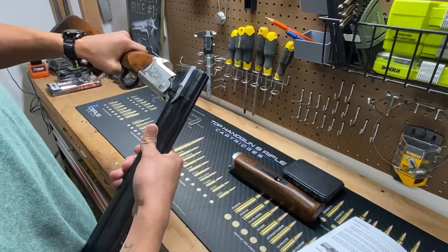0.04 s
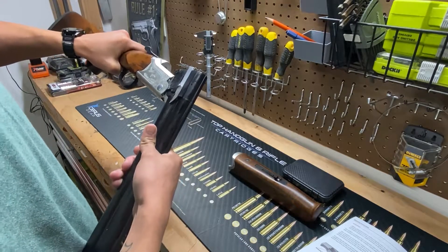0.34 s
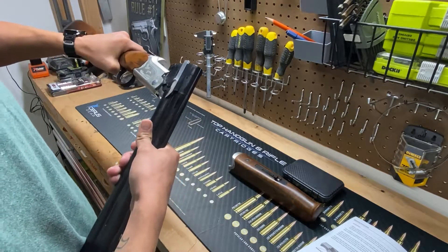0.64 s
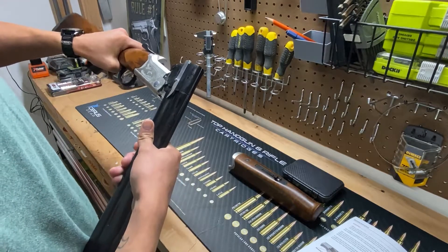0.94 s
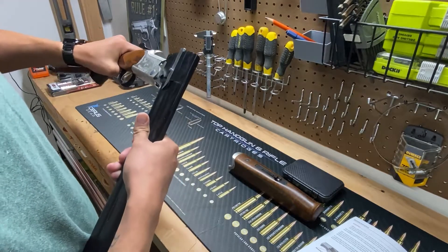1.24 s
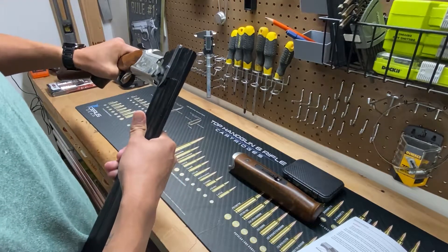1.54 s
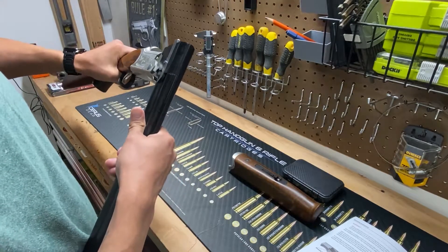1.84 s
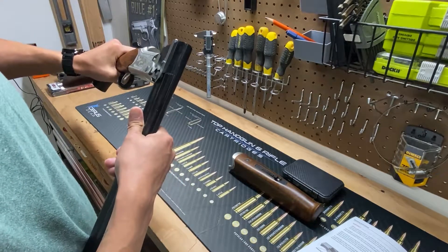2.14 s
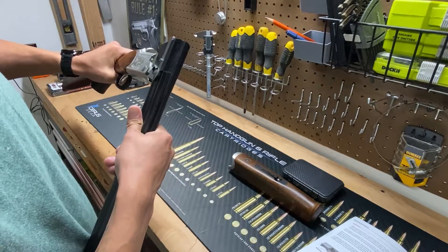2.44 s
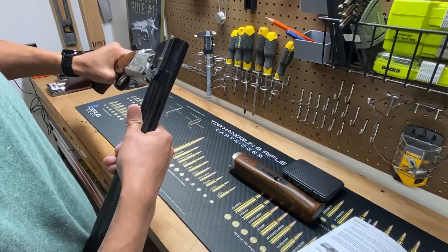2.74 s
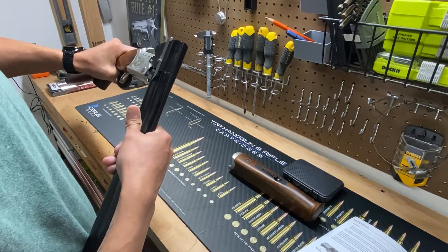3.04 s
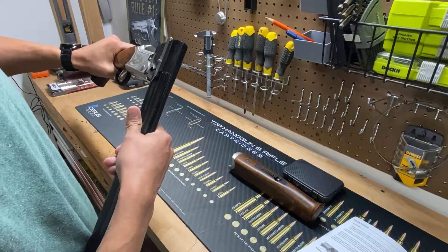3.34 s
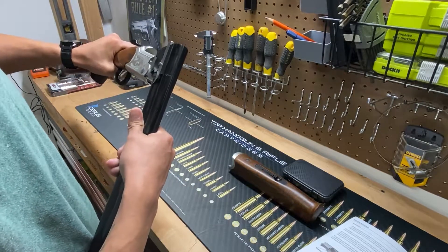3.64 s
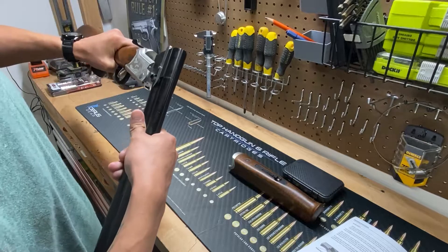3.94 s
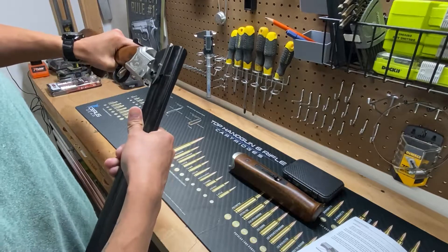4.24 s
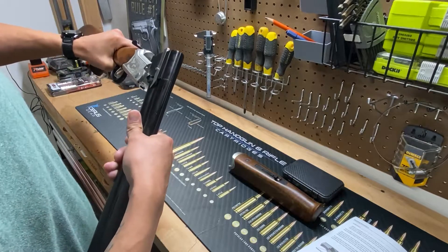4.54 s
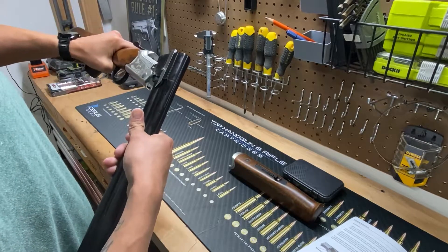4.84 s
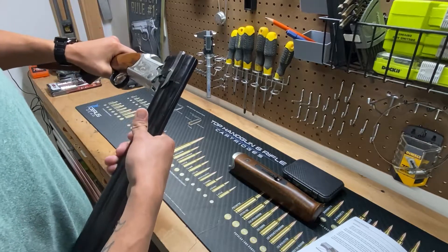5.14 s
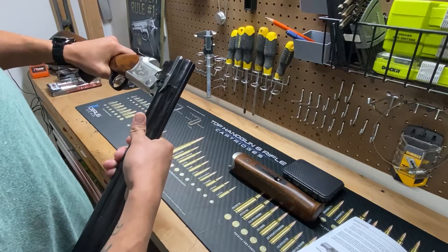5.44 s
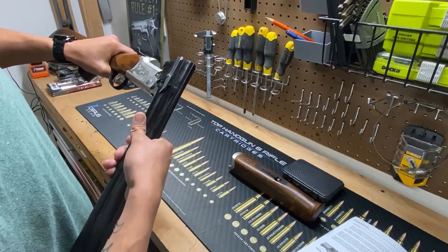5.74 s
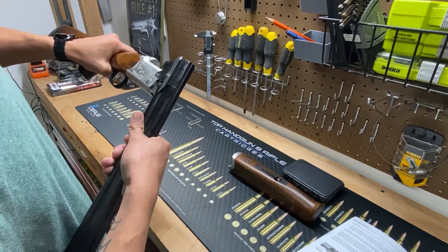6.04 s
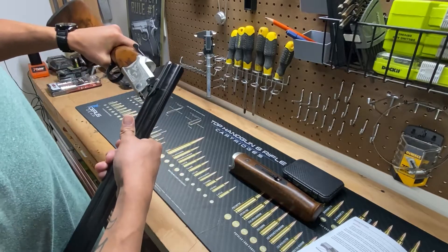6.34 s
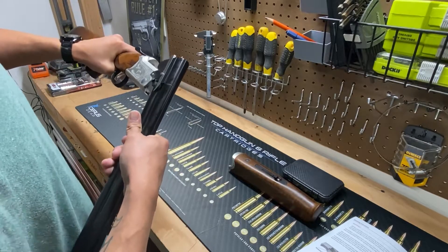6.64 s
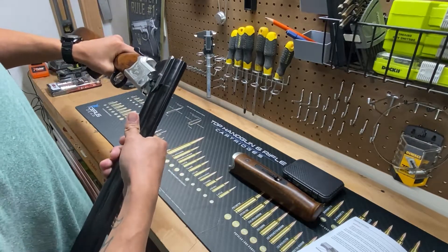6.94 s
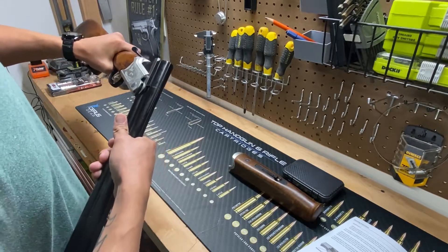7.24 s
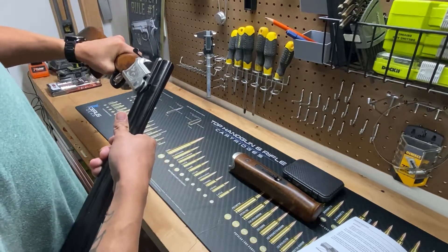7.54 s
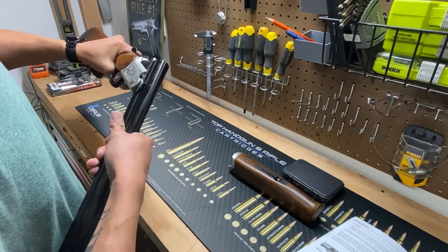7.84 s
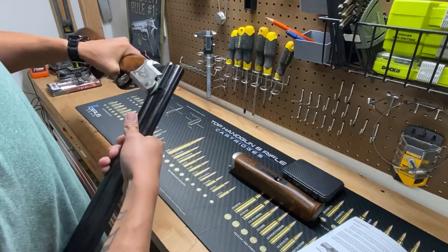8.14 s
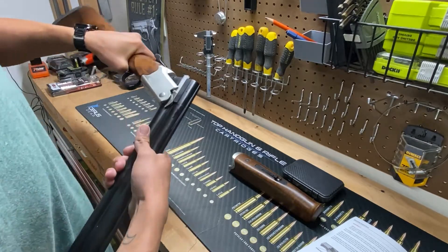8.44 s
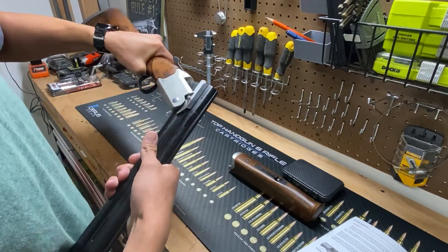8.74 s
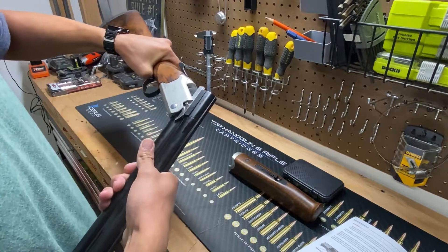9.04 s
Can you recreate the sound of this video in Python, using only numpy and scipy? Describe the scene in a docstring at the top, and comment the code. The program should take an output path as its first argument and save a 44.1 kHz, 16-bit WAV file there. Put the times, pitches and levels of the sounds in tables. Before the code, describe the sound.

A low motor hum with soft rumble runs throughout in a small workshop. Close by, a shotgun's steel receiver is worked onto its barrels. Light clicks, small knocks and brief faint scrapes fill the first 1.5 seconds, clearest at 0.5 and 1.2. After a lull, a knock comes at 2.6 and a loud double clack at 3. Smaller knocks follow at 3.5, 3.8, 4.4 and 4.8, while the barrels sing very faintly. Another loud double clack lands near 5.5, then a few soft taps. At about 7.1 a short scrape leads into the loudest sound, a bright double snap of steel, and a second hard snap follows at 7.8; both leave a faint ring. Only faint rubs and a tiny tick remain until about 9 seconds. Each contact has a short, tight room echo.

```python
"""A workbench in a small room. A shotgun's receiver is worked onto its barrels: steel slides on
steel in tiny slips, knocks, and twice snaps home, leaving a faint ring. Slips and knocks excite
the gun's resonances; the free barrels sing faintly. The bench and pegboard wall answer at once,
the room a little later. A motor hums low throughout, over rumble and faint air."""
import sys
import numpy as np
from scipy import signal
from scipy.fft import rfft, irfft, next_fast_len
from scipy.io import wavfile
from scipy.ndimage import uniform_filter1d, map_coordinates

SR = 44100
rng = np.random.default_rng(int(sys.argv[2]) if len(sys.argv) > 2 else 0)


def bounce(signal):
    """Save signal as a 16-bit WAV file at the path given by the first command-line argument."""
    frames = np.transpose(np.atleast_2d(signal))
    limited = np.clip(frames, -1, 1)
    pcm = np.round(limited * 32767).astype(np.int16)
    wavfile.write(sys.argv[1], SR, pcm)


N = 400867


def amp(db):
    """Decibels to gain."""
    return 10 ** (np.asarray(db) / 20)


def unit(x):
    """Scale to rms 1."""
    return x / np.sqrt(np.mean(x ** 2) + 1e-20)


def along(points, hz):
    """(Hz, value) points read on a log axis."""
    f, v = np.transpose(points)
    return np.interp(np.log(hz + 1), np.log(f), v)


def wobble(rate):
    """A smooth random curve, rate knots a second."""
    coarse = np.linspace(0, N, 8192)
    knots = rng.standard_normal(int(N * rate / SR) + 4)
    return np.interp(np.arange(N), coarse, map_coordinates(knots, [coarse * rate / SR]))


def resonance(hz, centre_hz, width_hz):
    """Magnitude of one mode, 1 at its centre."""
    return 1 / np.sqrt(1 + (2 * (hz - centre_hz) / width_hz) ** 2)


def filtered(x, gain):
    """x through the causal filter whose magnitude is gain(Hz)."""
    n = x.shape[-1]
    m = 2 * next_fast_len(n // 2 + 4096)
    cepstrum = irfft(np.log(np.maximum(gain(np.fft.rfftfreq(m, 1 / SR)), 1e-6)))
    cepstrum[1:m // 2] *= 2
    cepstrum[m // 2 + 1:] = 0
    return irfft(rfft(x, m) * np.exp(rfft(cepstrum)), m)[..., :n]


def from_left(x, lead_samples=8):
    """Direct sound arrives on the left first."""
    return np.array([x, np.pad(x, (lead_samples, 0))[:len(x)]])


# Left-right likeness: freq_hz, correlation
COHERENCE = [(60, 0.39), (300, 0.43), (640, 0.25), (1400, 0.16), (15000, 0.049)]


def stereo_field(pair):
    """Two unrelated signals to stereo, most alike in the bass."""
    n = pair.shape[-1]
    m = next_fast_len(n)
    angle = np.arccos(np.clip(along(COHERENCE, np.fft.rfftfreq(m, 1 / SR)), -1, 1)) / 2
    mid, side = irfft(rfft(pair, m) * [np.cos(angle), np.sin(angle)], m)[:, :n]
    return np.array([mid + side, mid - side])


# Contour of the hum's octave: time_s, level_db
OCTAVE_LEVELS = [(0.0, -66), (0.3, -64), (2.71, -65), (4.13, -84.5), (5.29, -73.5), (8.2, -83.5),
                 (9.09, -69.5)]


def motor_hum(pitch_hz, level_db, sag_db_per_s, octave_gain_db):
    """Slightly unsteady motor: a slowly weakening fundamental and its octave."""
    t = np.arange(N) / SR
    phase = 2 * np.pi * pitch_hz * (t + 0.00047 * wobble(4.7))
    fundamental = amp(level_db - sag_db_per_s * t + 0.67 * wobble(6))
    octave = amp(octave_gain_db + np.interp(t, *np.transpose(OCTAVE_LEVELS)))
    return fundamental * np.sin(phase) + octave * np.sin(2 * phase)


def noise(spectrum):
    """Stereo noise of rms 1."""
    white = rng.standard_normal((2, N))
    return unit(stereo_field(filtered(white, lambda hz: amp(along(spectrum, hz)))))


# Background spectra: freq_hz, relative_db
RUMBLE_SPECTRUM = [(20, -24.5), (38, -16), (55, -4), (80, -3), (105, -7.5), (140, -17), (220, -34.5),
                   (500, -69)]
AIR_SPECTRUM = [(100, -32.5), (170, -5.5), (284, -2.5), (542, -13.5), (808, -11), (2440, -18), (3300, -18),
                (10700, -31.5), (16000, -44)]


def rumble_and_air(rumble_db, air_db):
    """Steady low rumble and faint room air."""
    return amp(rumble_db) * noise(RUMBLE_SPECTRUM) + amp(air_db) * noise(AIR_SPECTRUM)


# Resonances of the held gun: pitch_hz, width_hz, level_db
GUN_MODES = [(299, 43, 0), (427, 98, -2), (675, 230, 4.5), (1029.3, 51, 7), (1153.5, 42, 3), (1396, 11, -3),
             (1700, 37, -1.5), (1722, 110, 4.5), (1878, 30, 7), (2275, 18, 6), (2440, 50, 0.5),
             (2826, 98, 2.5), (3300, 56, 1.5), (3724, 15, 0.5), (4470, 290, 5), (4910, 110, 4.5),
             (6020, 16, 3), (6540, 93, 8.5), (7100, 130, 3.5), (7700, 80, 8), (10270, 170, 6)]


def gun_response(hz, dense_db):
    """Strong modes above a bed of densely packed weak ones."""
    power = sum((amp(db) * resonance(hz, pitch, width)) ** 2 for pitch, width, db in GUN_MODES)
    return np.sqrt(amp(dense_db) ** 2 + power)


# Room decay: freq_hz, t60_s
ROOM_DECAY = [(150, 0.12), (400, 0.3), (1100, 0.26), (2800, 0.25), (7000, 0.24), (15000, 0.089)]


def room_tail(size):
    """Fresh stereo reverberation, energy 1 a side."""
    hz, t, spectra = signal.stft(rng.standard_normal((2, size)), SR, nperseg=256)
    decay = amp(-60 * t / along(ROOM_DECAY, hz)[:, None])
    tail = signal.istft(spectra * decay, SR, nperseg=256)[1][:, :size]
    return unit(tail) / np.sqrt(size)


# Modes that friction drives hardest: pitch_hz, width_hz, level_db
SQUEAK_MODES = [(1870, 210, 1.5), (2620, 100, -2), (3870, 56, -7), (4243, 280, -4.5), (6800, 200, 3),
                (7970, 120, -2.5)]


def squeaking(x, squeak_db, wander_db):
    """Friction feeds now one mode, now another, as the contact point moves."""
    modes = 0
    for hz, width_hz, db in SQUEAK_MODES:
        drive = amp(db + wander_db * np.tanh(wobble(8.2)))
        modes += drive * signal.lfilter(*signal.iirpeak(hz, hz / width_hz, SR), x)
    return x + amp(squeak_db) * modes


# Sliding strokes: start_s, length_s, rub_db, hiss_db, press_db (change from start to end)
STROKES = [(0.05, 0.11, -65.5, -68.5, 3), (0.41, 0.066, -55, -65, 7), (0.659, 0.036, -69, -79, 8.5),
           (0.906, 0.059, -73.5, -74.5, 2), (1.114, 0.041, -52, -64, 11), (1.231, 0.075, -53, -56, -3),
           (1.808, 0.03, -75, -81, 0), (2.065, 0.054, -70, -82.5, 11), (2.304, 0.12, -63, -80, 2),
           (2.567, 0.047, -57, -72, 8.5), (2.755, 0.026, -63, -78.5, 2), (2.998, 0.043, -63.5, -74, 13.5),
           (3.208, 0.17, -69, -87, -10), (3.41, 0.1, -72, -98.5, 20), (3.657, 0.095, -67, -90, 1),
           (4.15, 0.12, -79.5, -96, 0), (4.326, 0.032, -65, -71.5, 13), (4.669, 0.056, -71.5, -74, 2),
           (5.163, 0.069, -56, -68, 0), (5.894, 0.064, -74, -72.5, 2.5), (6.197, 0.15, -65, -67.5, -12),
           (6.405, 0.033, -85.5, -80.5, 0), (7.098, 0.053, -48.5, -47.5, 9.5),
           (7.524, 0.078, -79.5, -84.5, 0.5), (7.646, 0.07, -65, -75.5, 1), (8.081, 0.1, -72, -90.5, -2),
           (8.2, 0.055, -92, -76, -3), (8.66, 0.13, -80, -94, 3), (8.804, 0.062, -72, -75, 2),
           (8.879, 0.13, -66, -66.5, 2.5)]


def stroke_levels(grip_s=0.012, release_s=0.024, swell_db=4):
    """Rub and hiss gains: each stroke grips, follows the hand's pressure and speed, and lets go."""
    levels = np.zeros((2, N + SR))
    for start_s, length_s, rub_db, hiss_db, press_db in STROKES:
        t = np.arange(int((length_s + release_s) * SR)) / SR
        gate = np.minimum(t / grip_s, 1) * np.minimum((length_s + release_s - t) / release_s, 1)
        pressure_db = press_db * (np.minimum(t / length_s, 1) - .5)
        speed_db = swell_db * (np.sin(np.pi * t / t[-1]) - 1)
        envelope = gate * amp(pressure_db + speed_db)
        levels[:, round(start_s * SR):][:, :len(t)] += amp([[rub_db], [hiss_db]]) * envelope
    return levels[:, :N]


# Friction spectra: freq_hz, relative_db
RUB_SPECTRUM = [(60, -34.5), (170, -1), (400, 3), (800, -1.5), (1800, -4), (3200, -14), (5000, -27.5),
                (9000, -49.5)]
HISS_SPECTRUM = [(1500, -59), (3000, -7), (4300, 1.5), (7500, 0.5), (9000, -9.5), (12000, -3.5),
                 (15500, -18)]


def slides(rub_gain_db, hiss_gain_db, slips_per_s, spread_db, direct_db, smooth_db, room_db):
    """Steel catches and slips on steel: tiny uneven impacts excite the gun."""
    rub, hiss = stroke_levels()
    slipping = rng.random(N) < slips_per_s / SR
    slips = slipping * amp(spread_db * np.clip(rng.standard_normal(N), -2, 2) + 2.4 * wobble(70))
    t = np.arange(SR // 40) / SR
    bench = rng.standard_normal((2, len(t))) * amp(-60 * t / 0.016)
    echoes = unit(signal.oaconvolve(slips[None], bench, axes=1)[:, :N])
    scattered = stereo_field(echoes + amp(smooth_db) * rng.standard_normal((2, N)))
    grains = squeaking(amp(direct_db) * from_left(unit(slips)) + scattered, squeak_db=4, wander_db=7)
    grating = unit(filtered(grains, lambda hz: amp(along(RUB_SPECTRUM, hz)) * gun_response(hz, 0)))
    sheen = unit(filtered(grains, lambda hz: amp(along(HISS_SPECTRUM, hz))))
    dry = amp(rub_gain_db) * rub * grating + amp(hiss_gain_db) * hiss * sheen
    return dry + amp(room_db) * signal.oaconvolve(dry, room_tail(SR // 3), axes=1)[:, :N]


def contact_colour(thud_db, body_db, clack_db, tick_db, knock_hz, clink_hz, ping_hz=3874):
    """Gain curve of one contact: it favours one low and two high modes; the treble varies by chance."""
    low_db = thud_db + 17
    slope = [(40, low_db - 28), (130, low_db - 7), (300, low_db + 1),
             (620, body_db + 3), (860, body_db / 2 - 3), (1050, 2),
             (1800, 0.27 + 0.17 * clack_db), (3600, clack_db - 0.5),
             (7500, tick_db), (11000, tick_db - 4), (15500, tick_db - 13)]
    grid_hz = np.arange(2000, SR / 2, 250)
    chance_db = 2.5 * np.clip(rng.standard_normal(len(grid_hz)), -1.5, 1.5)

    def colour(hz):
        bright = resonance(hz, clink_hz, 79) ** 2 + resonance(hz, ping_hz, 79) ** 2
        favoured = 1 + resonance(hz, knock_hz, 89) ** 2 + amp(3) * bright
        return amp(along(slope, hz) + np.interp(hz, grid_hz, chance_db, left=0)) * favoured
    return colour


def contact(t, colour, chatter_t60_s, hardness, rise_s=0.006, room_db=-4.5, room_rise_s=0.003):
    """One blow: a crack, shorter and stronger if hard; chatter and bench echoes; then the room."""
    def burst(t60_s):
        white = rng.standard_normal((2, len(t)))
        return unit(white * amp(-60 * t / t60_s) * (1 - np.exp(-t / rise_s))) / np.sqrt(len(t))
    chatter = burst(chatter_t60_s)
    room = amp(room_db) * room_tail(len(t)) * (1 - np.exp(-t / room_rise_s))
    crack = amp(-0.5 + 2.8 * hardness) * from_left(burst(.06 / (1 + hardness))[0])
    fade = np.minimum(10 * (1 - t / t[-1]), 1) ** 2
    blow = (stereo_field(chatter + room) + crack) * fade
    # a short blow has a flat spectrum: level it, then colour it
    power = np.mean(np.abs(rfft(blow)) ** 2, axis=0)
    power = np.abs(uniform_filter1d(power, size=48)) + 1e-9
    bins_hz = np.fft.rfftfreq(len(t), 1 / SR)
    return filtered(blow, lambda hz: colour(hz) / np.sqrt(np.interp(hz, bins_hz, power)))


# Steel contacts (thud to tick: relative band weights; pan: left minus right):
# start_s, level_db, thud_db, body_db, clack_db, tick_db, knock_hz, clink_hz, pan_db, chatter_t60_s
CONTACTS = [(0.157, -42.5, -19.5, 1.5, -4, -41, 1860, 3610, -1, 0.021),
            (0.285, -56, -0.5, 13, -8, -27, 1020, 3400, -1, 0.058),
            (0.326, -50.5, -18, 4.5, -17, -32, 1150, 2650, 0.5, 0.019),
            (0.427, -50, -14, 1, -2, -25, 1700, 2480, 0, 0.04),
            (0.467, -50.5, -5, -9, 0, -14, 1690, 2570, -3, 0.029),
            (0.536, -37, -26, 2, -11.5, -29.5, 1670, 2370, -1.5, 0.027),
            (0.5421, -38, -12.5, 1.5, -37, -45, 1040, 2400, 5.5, 0.027),
            (0.601, -52.5, -5, 6.5, -18, -18, 1030, 2770, -1, 0.06),
            (0.750, -51.5, -17, -2.5, -14, -35, 1090, 2380, -2, 0.034),
            (0.856, -63, -3.5, 8, 3.5, -41, 1140, 2620, 1, 0.14),
            (1.073, -68, -2, -9, 4, -8, 1670, 3300, -2, 0.05),
            (1.151, -36, -19.5, -2.5, -9, -24, 1810, 2600, 0.5, 0.19),
            (1.348, -53, -7.5, 5.5, 0.5, -17.5, 1700, 3070, -2.5, 0.046),
            (1.492, -55.5, -1.5, 7, -5, -17, 1730, 2830, 1, 0.11),
            (2.122, -54, -8, 5.5, -14, -39, 1000, 2660, -1.5, 0.061),
            (2.614, -31, -19, -4.5, -16.5, -39, 1016, 3000, -2.5, 0.066),
            (3.037, -19, -30, -10.5, -14, -32, 1620, 2580, 0, 0.062),
            (3.057, -25, -15.5, -0.5, -15, -28.5, 1050, 2410, -0.5, 0.033),
            (3.133, -40, -12, -4, -12.5, -28.5, 1100, 2600, -1.5, 0.037),
            (3.507, -35, -17, -3.5, -12, -41, 945, 3100, 0, 0.061),
            (3.761, -33.5, -22, -6.5, -9.5, -41.5, 1030, 3270, -2, 0.021),
            (4.359, -35, -9, 1, -3, -34, 1740, 3050, 0.5, 0.032),
            (4.807, -39, -21.5, -5.5, -30, -46, 1076, 3080, 2.5, 0.06),
            (4.838, -41.5, -14.5, -2.5, -23.5, -43, 1020, 2930, -4, 0.05),
            (5.070, -75, -9.5, 4, 12, -6, 1800, 3350, -2.5, 0.036),
            (5.401, -33, -21, -0.5, -26, -35.5, 1056, 2520, -0.5, 0.23),
            (5.4684, -19.5, -25.5, -2, -14.5, -31, 1226, 3070, -1.5, 0.049),
            (6.127, -68.5, -10, -4, -3, -2, 1160, 3150, -3, 0.069),
            (6.499, -55, -1, 5.5, 2.5, -15.5, 1130, 3480, -1, 0.14),
            (6.521, -46, -11.5, 2.5, -31.5, -42, 1120, 3330, 2, 0.11),
            (6.723, -63.5, -14, -3, -6.5, -3.5, 1670, 2880, -5, 0.14),
            (6.871, -49.5, -9, -1.5, -24, -34, 977, 2630, -2, 0.087),
            (7.1532, -10, -29.5, -15, -6, -23, 1500, 2790, -0.5, 0.15),
            (7.1765, -14.5, -18.5, -11.5, -3.5, 0, 1910, 2950, -2, 0.05),
            (7.732, -36, -21.5, -3.5, -17, -26.5, 1140, 2470, 0, 0.097),
            (7.7599, -13, -29, -12.5, -9.5, -20, 1190, 5016, -1.5, 0.055),
            (8.828, -64, -4, 3, -8.5, -4, 1880, 2498, -1, 0.06)]


def knocks(gain_db, ring_hz):
    """Soft, heavy contacts thud, hard ones tick; each rings the gun in its own colour."""
    out = np.zeros((2, N + SR))
    t = np.arange(SR // 3) / SR
    for start_s, level_db, thud, body, clack, tick, knock_hz, clink_hz, pan_db, t60_s in CONTACTS:
        colour = contact_colour(thud, body, clack, tick, knock_hz, clink_hz)
        blow = contact(t, colour, t60_s, hardness=np.clip(1 + tick / 30, 0, 1))
        gains = amp(level_db + gain_db + np.array([[pan_db], [-pan_db]]) / 2)
        out[:, round(start_s * SR):][:, :len(t)] += gains * blow
    # one barely damped mode, heard after the hardest snaps
    ring = lambda hz: 1 + .4 * resonance(hz, ring_hz, width_hz=4.6) ** 2
    return filtered(out[:, :N], lambda hz: gun_response(hz, dense_db=-2) * ring(hz))


# Long, weak barrel modes: pitch_hz, level_db
BARREL_MODES = [(840, 0), (1077, -15), (1728, -19), (1911, -20), (2412, -19)]
# Spans of the barrels' note: start_s, length_s, level_db
BARREL_NOTES = [(2.55, 2.56, -75.5), (7.55, 1.1, -78)]


def barrel_note(gain_db, waver_rad, arch_power):
    """The barrels sing faintly while they hang free of the receiver."""
    t = np.arange(N) / SR
    drift = waver_rad * wobble(14)
    envelope = np.zeros(N)
    for start_s, length_s, level_db in BARREL_NOTES:
        progress = np.clip((t - start_s) / length_s, 0, 1)
        envelope += amp(level_db) * np.abs(np.sin(np.pi * progress)) ** arch_power
    tone = sum(amp(db) * np.sin(2 * np.pi * hz * t + drift) for hz, db in BARREL_MODES)
    return amp(gain_db) * envelope * tone


def scene():
    """The gun handled close by, the motor and room behind it."""
    gun = knocks(gain_db=31, ring_hz=1565)
    gun += slides(rub_gain_db=5, hiss_gain_db=2, slips_per_s=450, spread_db=1.5,
                  direct_db=-4.5, smooth_db=-7.5, room_db=-10)
    gun += barrel_note(gain_db=3.5, waver_rad=0.22, arch_power=0.41)
    hum = motor_hum(pitch_hz=58.95, level_db=-50, sag_db_per_s=0.24, octave_gain_db=3)
    return gun + hum + rumble_and_air(rumble_db=-64.5, air_db=-77)


def record(dry):
    """Low-pass: nothing above top_hz."""
    top_hz, taper_hz = 16400, 800
    m = next_fast_len(N + SR // 2)
    passband = np.clip((top_hz - np.fft.rfftfreq(m, 1 / SR)) / taper_hz, 0, 1) ** 2
    return irfft(rfft(dry, m) * passband, m)[:, :N]


dry = scene()
out = record(dry)
bounce(out)
```